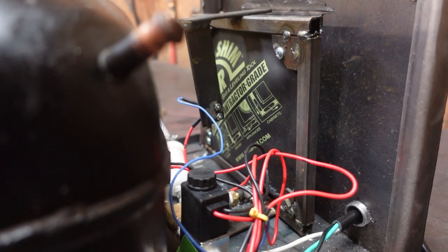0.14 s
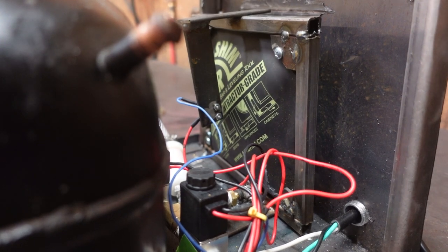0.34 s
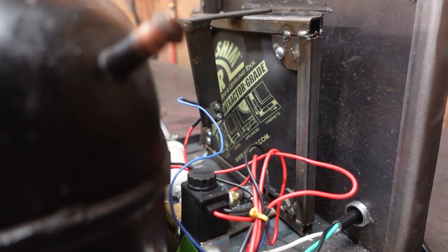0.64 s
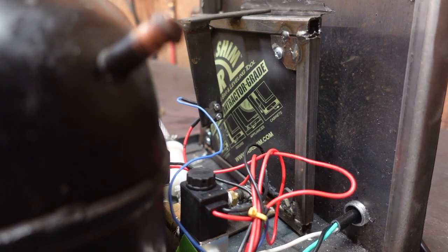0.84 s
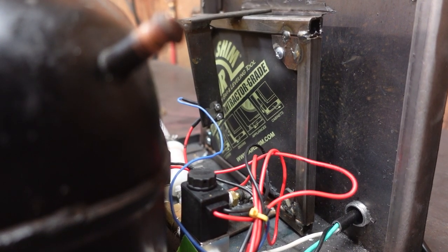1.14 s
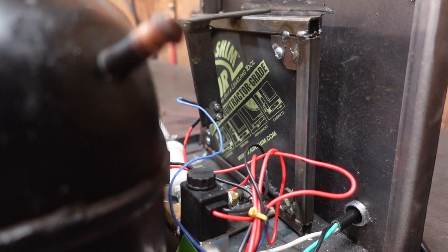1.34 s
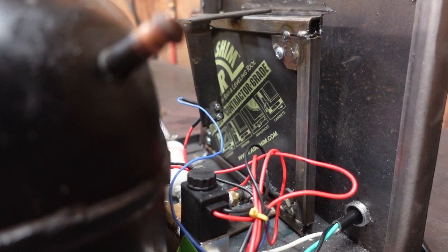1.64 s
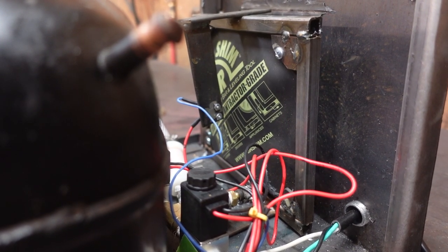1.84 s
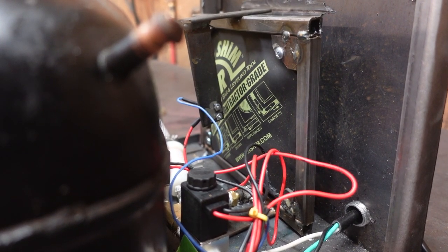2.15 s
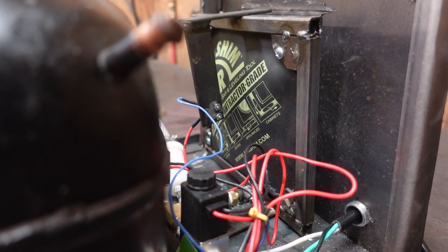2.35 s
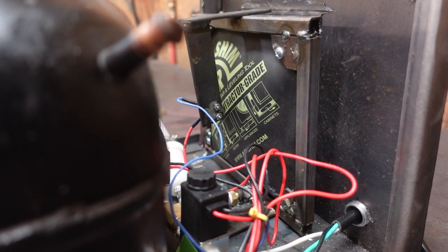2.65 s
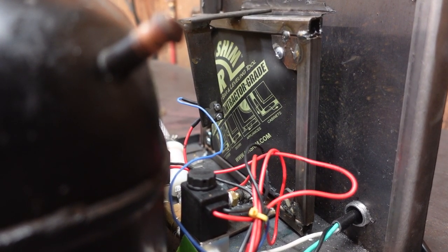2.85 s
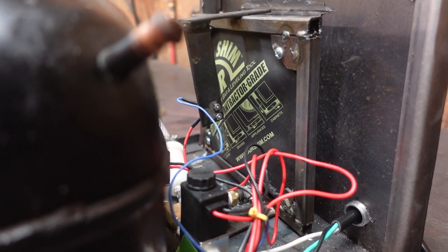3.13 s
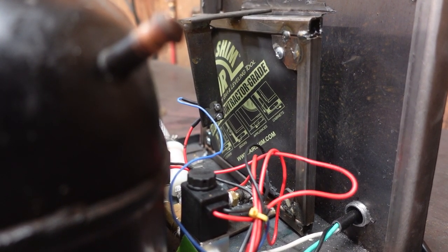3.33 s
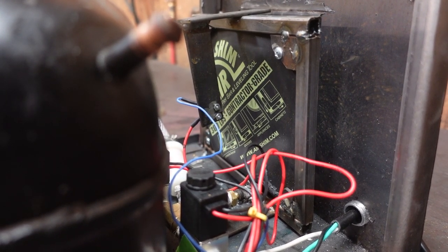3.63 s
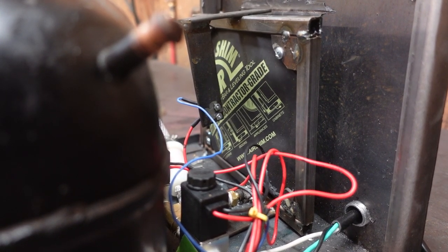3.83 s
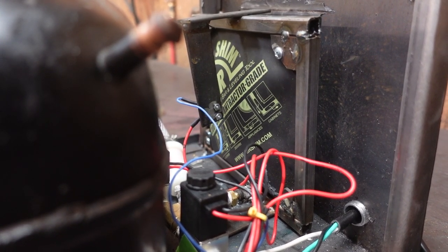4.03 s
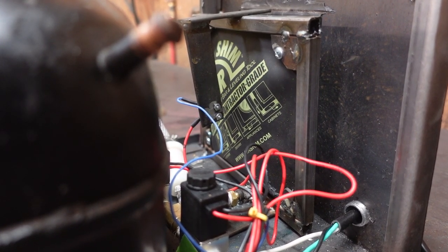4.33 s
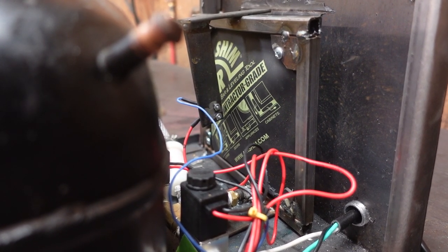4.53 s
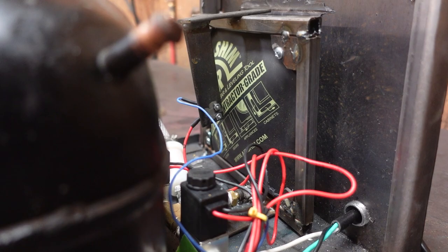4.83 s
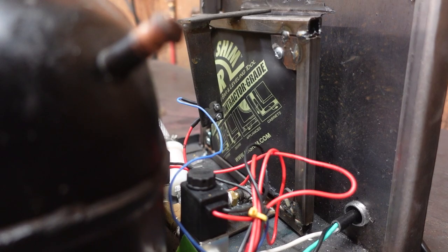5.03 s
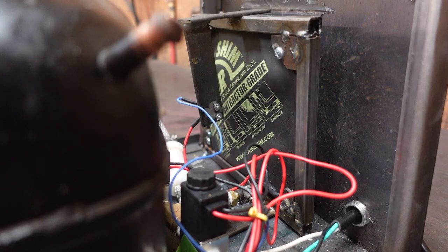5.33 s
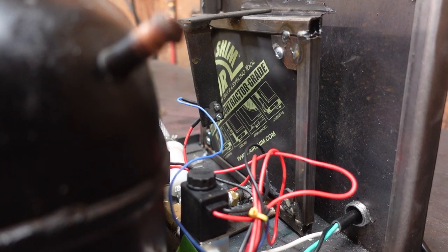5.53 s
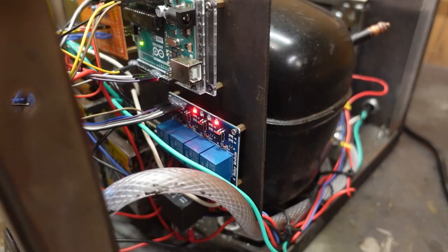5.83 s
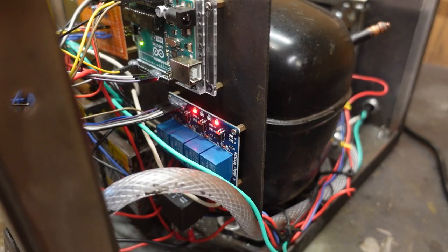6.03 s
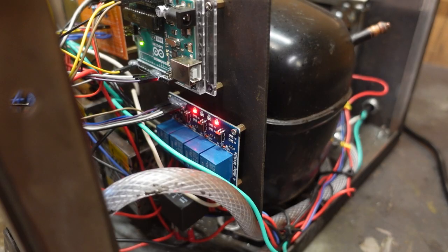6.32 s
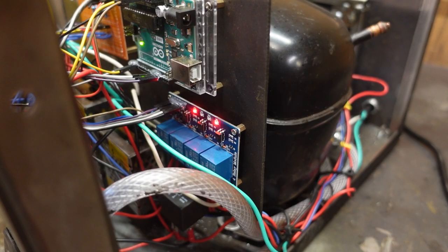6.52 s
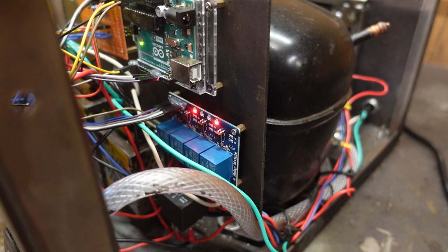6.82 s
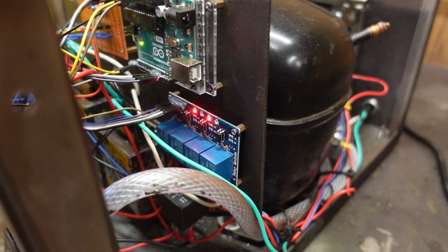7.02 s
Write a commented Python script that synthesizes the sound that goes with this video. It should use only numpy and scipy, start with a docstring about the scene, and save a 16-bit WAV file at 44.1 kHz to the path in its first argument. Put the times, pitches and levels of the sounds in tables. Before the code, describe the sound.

A small compressor hums while an electric valve clacks open about every two seconds, air hisses, and the valve vents with a puff.

```python
"""A small sealed compressor hums in a steel frame in a workshop, feeding an air line. Soon a relay
ticks and an electric valve clacks open as a magnet pulls its plunger in. Air sings through the pipe
for a second. Then the plunger springs back, the valve vents with a puff, the tubing rings and the gas
settles with a faint hiss. Dull knocks follow each change of pressure. This comes round about every
two seconds, and the sound ends just after the fourth opening."""
import sys
import numpy as np
from scipy import signal
from scipy.fft import rfft, irfft, next_fast_len
from scipy.io import wavfile
from scipy.ndimage import map_coordinates

SR = 44100
rng = np.random.default_rng(int(sys.argv[2]) if len(sys.argv) > 2 else 0)


def pcm_store(signal):
    """Save signal as 16-bit PCM."""
    levels = np.round(np.clip(np.atleast_2d(signal), -1, 1) * 32767)
    wavfile.write(sys.argv[1], SR, levels.astype(np.int16).T)


N = 316197
TIME = np.arange(N) / SR

# the plunger pulls in: start t/s, hit t/s, scrape level/dB, hit level/dB, ring level/dB, treble lift/dB
OPENINGS = [(0.5922, 0.6, -17.5, -5, -22.5, -6.5), (2.711, 2.718, -17.5, -4.5, -19.5, -1.5),
            (4.8753, 4.8827, -19, -6, -17.5, 1.5), (6.9451, 6.9516, -22.5, -10.5, -27, 3.5),
            (6.955, 6.9557, -30, -11, -18.5, 0)]
# the steel frame's tone colour (how strong each pitch is): f/Hz, relative level/dB
FRAME_COLOUR = [(120, -47.5), (200, -11), (432, -10), (558, -6.5), (1040, -15.5), (1530, -6), (1770, -8),
                (2420, -5.5), (2650, -9.5), (3190, -4), (3760, -13), (4950, -6.5), (8120, -16.5),
                (12600, -17), (16000, -30)]
# how long the frame rings: f/Hz, fade time/s (the time to fall by 60 dB, called t60)
FRAME_FADES = [(300, .3), (1500, .28), (4000, .24), (8000, .19), (15000, .17)]
def valve_opens():
    """A hard clack: the valve body rings and shakes the frame, which answers alike every time."""
    out = np.zeros(N)
    frame = from_db(7.5) * noise(FRAME_COLOUR, size=SR) * dying(0.045)
    frame += from_db(-3) * fading_noise(FRAME_COLOUR, FRAME_FADES)
    for start, hit, scrape_db, hit_db, ring_db, treble_db in OPENINGS:
        clack = plunger(hit - start, scrape_db, hit_db, hold_s=0.00045, t60=0.011)
        add(out, start, lift_treble(clack, treble_db))
        ring = frame + from_db(-5.5) * valve_ring()
        add(out, hit, from_db(ring_db) * lift_treble(ring, treble_db))
    return out


# tone colours of the plunger's scrape and of its hit: f/Hz, relative level/dB
SCRAPE_COLOUR = [(290, -40), (500, 0), (3150, 2), (7980, 11), (10200, 4), (11000, 3), (13300, 5),
                 (16000, -27)]
HIT_COLOUR = [(290, -6), (500, -10.5), (1250, -33), (3290, 0), (4600, -13.5), (8960, 0.5), (13400, 0),
              (16000, -11)]
def plunger(travel_s, scrape_db, hit_db, hold_s, t60):
    """The plunger scrapes along its tube, then chatters briefly against its stop."""
    t = TIME[:SR]
    since_hit = t - travel_s
    sliding = np.minimum(t / 0.0041, 1) * np.exp(-np.maximum(since_hit, 0) / 0.005)
    scrape = from_db(scrape_db) * noise(SCRAPE_COLOUR, size=SR) * sliding
    blow = (since_hit >= 0) * np.exp(-np.log(1000) * np.maximum(since_hit - hold_s, 0) / t60)
    return scrape + from_db(hit_db) * noise(HIT_COLOUR, size=SR) * blow


# the valve body's own notes: f/Hz, relative level/dB, fade time/s (held to 0.4 at most)
VALVE_NOTES = [(583.5, -9, 0.29), (815, -8, 0.22), (1204, -6.5, 0.17), (1543, 4.5, 0.1), (2000, -14, 0.28),
               (2140, 2, 0.089), (2340, -11, 0.15), (3170, -0.5, 0.095), (3725, -2, 0.1), (4010, -22, 0.48),
               (4260, -40, 0.46), (4600, -3, 0.045), (5020, -2, 0.05), (5370, 3.5, 0.029),
               (5520, -12.5, 0.084), (5950, -7, 0.096), (8800, -21, 0.2), (9920, -30, 0.25),
               (10300, -31, .15), (12300, -27, .19), (12810, -25, 0.25)]
def valve_ring(spread_db=4.0):
    """Every blow rings the same notes in the metal, each with a new strength."""
    return sum(from_db(db + spread_db * rng.standard_normal()) * ringing_note(hz, min(t60, .4))
               for hz, db, t60 in VALVE_NOTES)


# the plunger springs back: start t/s, hit t/s, scrape level/dB, hit level/dB, air level/dB,
# outlet pitch/ratio, panel level/dB
VENTINGS = [(1.6322, 1.6414, -26.5, -2, -22, 1, -29), (3.7526, 3.761, -20.5, -2, -19.5, 1, -24),
            (5.87, 5.8803, -15.5, -5, -22.5, 0.93, -18)]
# tone colour of the escaping air: f/Hz, relative level/dB
PUFF_COLOUR = [(59, -44), (100, -16.5), (260, -27), (315, -1.5), (691, -0.5), (818, -11.5), (991, -16),
               (1230, -5), (2000, -17), (2420, -6.5), (3940, -13.5), (6840, -15.5), (7770, -21),
               (10900, -21), (16000, -34)]
# how long the puff lasts: f/Hz, fade time/s
PUFF_FADES = [(150, 1), (600, 0.54), (1400, 1), (3000, 0.62), (6500, 0.61), (9000, 0.33), (15000, 0.45)]
# the outlet's breathy notes: f/Hz, width/Hz, relative level/dB
OUTLET_NOTES = [(402, 130, -2), (1377, 130, 4), (1630, 200, 1), (2573, 220, -10.5), (3254, 510, 1),
                (5440, 860, -12), (7060, 200, -13)]
def valve_vents():
    """Trapped air pops, shakes a panel and rushes out of an outlet whose pitch swoops up."""
    out = np.zeros(N)
    pop = np.sin(2 * np.pi * 330 * TIME[:SR]) * dying(0.0062)
    sag_hz = 330 * dying(.3)
    for start, hit, scrape_db, hit_db, air_db, pitch, panel_db in VENTINGS:
        add(out, start, plunger(hit - start, scrape_db, hit_db, hold_s=0.00018, t60=0.01))
        outlet = sum(from_db(db) * narrow_noise(hz * pitch - sag_hz * min(hz / 1400, 1), width)
                     for hz, width, db in OUTLET_NOTES)
        rush = from_db(-1.5) * fading_noise(PUFF_COLOUR, PUFF_FADES)
        rush += from_db(-3.5) * unit_level(outlet) * dying(0.66) * (1 - dying(0.11))
        rattle = noise(FRAME_COLOUR, size=SR) * dying(0.11)
        add(out, hit, from_db(air_db) * (rush + from_db(2.5) * rattle - from_db(22.5) * pop))
        panel = narrow_noise(np.full(SR, 820), width_hz=72) * dying(0.19)
        add(out, hit, from_db(panel_db) * panel)
    return out


# the tubing's own notes: f/Hz, relative level/dB, fade time/s (held to 0.5 at most)
TUBE_NOTES = [(1184, 0, 0.42), (1415, -7, 0.82), (2530, 0, 0.38), (2589, -9, 0.66), (3180, -10, 0.41),
              (3440, -11, 0.38), (4200, -17, 0.91), (4630, -18, 1.6), (4936, -7, 0.24), (5195, -20, 1.1),
              (5819, -20, 0.65), (6840, -5, 0.37)]
def tube_ring(below_air_db=14.5, spread_db=2.0):
    """The tubing rings each time it lets go of its pressure."""
    out = np.zeros(N)
    for _, hit, _, _, air_db, *_ in VENTINGS:
        for hz, db, t60 in TUBE_NOTES:
            note = ringing_note(hz, min(t60, .5))
            add(out, hit, from_db(air_db - below_air_db + db + spread_db * rng.standard_normal()) * note)
    return out


# dull knocks: t/s, level/dB, f/Hz
KNOCK_BLOWS = [(0.0040, -15, 413), (0.7945, -30.5, 656), (1.2250, -13, 443), (1.5542, -21.5, 479.7),
               (2.1497, -13, 416), (2.8980, -28.5, 587), (3.3280, -11, 435), (3.6560, -19, 486),
               (4.2877, -9.5, 403), (5.0765, -26, 610), (5.5081, -8.5, 445), (5.8355, -18, 480),
               (6.3614, -11, 374), (7.1510, -31.5, 497)]
def knocks(edge_hz=704, edge_db=-19.5):
    """Soft, low blows, each with a quieter, higher edge and a short dull echo of the room."""
    out = np.zeros(N)
    echo_colour = [(60, -17), (200, 0), (400, 6.5), (700, -4.5), (1100, -22.5), (4000, -45),
                   (12000, -61)]
    echo_shape = (1 - dying(.008)) ** 2 * (dying(0.3) + from_db(12.5) * dying(0.025))
    for s, db, hz in KNOCK_BLOWS:
        blow = thump(hz, cycles=.53) + from_db(edge_db) * thump(edge_hz, cycles=1.0)
        add(out, s - 0.01, from_db(db) * blow)
        add(out, s, from_db(db - 22) * noise(echo_colour, size=SR) * echo_shape)
    return out


def thump(hz, cycles):
    """A very short swing, strongest about 10 ms in; more cycles make it longer."""
    t = TIME[:SR // 50] - 0.01
    return np.cos(2 * np.pi * hz * t + np.pi / 3) * np.exp(-(t * hz / cycles) ** 2)


# short ticks (the relay, the valve's small after-click, and the sharp edge of three dull knocks):
# t/s, level/dB, lowest f/Hz, highest f/Hz
SHORT_TICKS = [(0.547, -31, 300, 14000), (0.6604, -24.5, 4000, 9000), (1.226, -27.5, 1200, 3500),
               (2.6980, -28, 300, 14000), (2.7647, -21.5, 4000, 9000), (3.329, -21.5, 1200, 4000),
               (4.84, -25.5, 297, 13850), (4.9426, -18, 4000, 8900), (5.508, -23, 1200, 3500),
               (6.913, -32.5, 300, 14050), (7.0165, -21.5, 3960, 8500)]
# tone colour of a tick: f/Hz, relative level/dB
TICK_COLOUR = [(200, 11.5), (500, 8), (1200, -9), (4000, -15), (8000, -9), (13000, -9), (16000, -10)]
def ticks():
    """Each tick is a quick burst of noise with a softer tail, kept to its own range of pitches."""
    out = np.zeros(N)
    for s, db, low_hz, top_hz in SHORT_TICKS:
        burst = noise(TICK_COLOUR, size=SR) * (dying(0.035) + from_db(-11.5) * dying(0.16))
        band = signal.butter(2, [low_hz, top_hz], "band", fs=SR, output="sos")
        add(out, s, from_db(db) * signal.sosfilt(band, burst))
    return out


# air starts to fill the line: t/s, flow level/dB, level/dB of the surge in the pump's shell
FILLS = [(0.66, -49, -48), (2.765, -45.5, -46), (4.943, -43.5, -39.5), (7.016, -47.5, -39.5)]
def air_line(fade_db_per_s=2, pressure_lag_s=0.4):
    """Gives the slackening flow, its age in seconds, and the pressure (0-1), which trails the valve."""
    flow, age, is_open = np.zeros((3, N))
    stops = [row[0] for row in VENTINGS] + [np.inf]
    for (start, db, _), stop in zip(FILLS, stops):
        gate = np.clip((TIME - start) / 0.04124 + 1, 0, 1) * np.clip((stop - TIME) / 0.0128 + 1, 0, 1)
        t = np.maximum(TIME - start, 0)
        flow += gate * from_db(db - fade_db_per_s * t)
        age += gate * t
        is_open += gate
    lag = np.exp(-1 / (pressure_lag_s * SR))
    return flow, age, signal.lfilter([1 - lag], [1, -lag], is_open)


# the pipe's own notes: f/Hz, width/Hz, relative level/dB, change over one second of filling/dB
PIPE_NOTES = [(1870, 80, -9, -10), (2300, 150, -13, 0), (2980, 70, -11, -10), (3150, 130, -15, 16),
              (3280, 35, -2, -10), (3560, 24, 0, 0), (3680, 30, -7, -3), (3940, 30, -1, -3),
              (4005, 28, 0, -5), (4890, 25, -9, 0), (5470, 80, -10, -3), (5970, 40, -11, 0),
              (6170, 20, -9, 2), (6800, 250, -19, 10), (7350, 50, -19, 0), (8540, 40, -10, 0),
              (9170, 60, -18, 0), (9600, 45, -13, 2), (9820, 40, -18, 0), (11000, 250, -21, 9),
              (12600, 450, -22, -7)]
# tone colour of the rushing air: f/Hz, relative level/dB
FLOW_COLOUR = [(180, -39), (300, -6), (603, 6.5), (1100, -4), (1360, 1.5), (1660, -6), (1870, -17),
               (2700, -9), (2930, -13.5), (3950, -15), (4230, -13.5), (12900, -16.5), (16000, -38)]
def air_flow(flow, age, whistle_hz=2220, rise_hz_per_s=460):
    """Air hisses and sets the pipe singing; as it fills, notes fade or grow and a whistle climbs."""
    from_middle = age - .5   # seconds from the middle of a usual fill
    singing = sum(resonate(rng.standard_normal(N), [note])
                  * from_db(change_db * from_middle + 0.7 * drift(6.7))
                  for *note, change_db in PIPE_NOTES)
    singing /= np.std(singing[age > 0])
    whistle = from_db(-21 + 13.5 * age) * narrow_noise(whistle_hz + rise_hz_per_s * age, width_hz=90)
    hiss = from_db(-3 + 4 * from_middle) * plate_echoes(noise(FLOW_COLOUR))
    return flow * (singing + whistle + hiss)


# gas settles in the pump after each venting: t/s, level/dB (each sound using it adds its own offset)
GAS_SETTLES = [(-0.35, -49), (1.75, -43), (3.87, -37.5), (5.99, -48)]
SETTLE_RISE_S = 0.032
def gas_hollow(flow, age, pressure, rest_hz=1440, sag_hz=139.6, wander_hz=16):
    """Gas sounds a breathy note in a hollow; the pitch sinks as the pressure rises, then recovers."""
    hz = rest_hz - sag_hz * pressure + wander_hz * drift(5.7)
    filling = flow * from_db(2.5 - 9.5 * age)
    settling = surges(GAS_SETTLES, SETTLE_RISE_S, fade_db_per_s=12.5)
    idle = from_db(-51.5) * (1 - pressure)
    core = from_db(-6) * narrow_noise(hz, width_hz=45.5)
    breath = from_db(-5.5) * narrow_noise(hz, width_hz=210)
    return np.sqrt(filling ** 2 + settling ** 2 + idle ** 2) * (core + breath)


def settling_hiss():
    """A faint, wide hiss lingers as the gas settles."""
    colour = [(200, -13), (900, 11), (2000, -6), (5000, -8), (12000, -14.5), (16000, -24)]
    level = from_db(-11.5) * surges(GAS_SETTLES, SETTLE_RISE_S, fade_db_per_s=4)
    return level * plate_echoes(noise(colour))


# tones of the motor and the mains: f/Hz, level/dB
HUM_TONES = [(59.3, -49.5), (69, -53), (91.5, -50.5), (120, -54), (128, -68)]
# the pump's sway on its springs, and its rumble: t/s, relative level/dB
SWAY_LEVELS = [(0.0, -45.5), (0.36, -23), (1.36, -38.5), (2.31, -46), (2.54, -30.5), (3.03, -36.5),
               (3.13, -56), (4.13, -32), (4.49, -39.5), (4.81, -25), (5.01, -34.5), (7.17, -43.5)]
RUMBLE_LEVELS = [(0.0, -48), (2.06, -45.5), (2.21, -45), (3.03, -45.5), (3.28, -41.5), (5.95, -41),
                 (6.47, -44.5), (7.17, -42)]
MOTOR_HZ, SWAY_HZ = 59.3, 13.9
def compressor():
    """The motor hums, wavering a little, while the pump rumbles and sways on its springs."""
    hum = 0
    for hz, db in HUM_TONES:
        level = from_db(db + drift(4)) * np.sqrt(2)
        hum += level * np.sin(2 * np.pi * (hz * TIME + rng.random()) + 0.31 * drift(2.03))
    sway = from_db(in_time(SWAY_LEVELS) - 2.5) * np.sqrt(2) * np.sin(2 * np.pi * SWAY_HZ * TIME)
    colour = [(10, -30), (30, 0.5), (60, 2), (130, 1.5), (220, -9), (500, -13), (1500, -39.5),
              (8000, -72.5)]
    rumble = from_db(in_time(RUMBLE_LEVELS) + 1) * noise(colour)
    return hum + sway + rumble


# notes of the pump's shell: f/Hz, width/Hz, relative level/dB
SHELL_NOTES = [(1870, 51, -1), (2270, 155, -11.5), (2978, 88, -2), (3279, 44, 4), (3990, 50, -9),
               (4300, 120, -12), (4880, 380, -14.5), (5570, 63, -12), (5900, 200, -21.5)]
def shell_hiss():
    """Each motor turn puffs gas into the shell. The hiss surges at each switching and swells between."""
    opening = surges([(s, db) for s, _, db in FILLS], rise_s=0.018, fade_db_per_s=29)
    venting = from_db(-3.5) * surges(GAS_SETTLES, SETTLE_RISE_S, fade_db_per_s=63)
    building = from_db(-5) * surges(GAS_SETTLES, rise_s=0.9, fade_db_per_s=7)
    idle = from_db(-56)
    flutter = from_db(drift(18))
    level = flutter * np.sqrt(opening ** 2 + venting ** 2 + building ** 2 + idle ** 2)
    puffs = from_db(2 * np.cos(2 * np.pi * MOTOR_HZ * TIME)) * rng.standard_normal(N)
    return level * plate_echoes(resonate(puffs, SHELL_NOTES))


def casing_drone():
    """The casing rings softly and steadily on four low notes."""
    notes = [(320, 14, 3), (607.5, 19.6, 3), (659, 33, -3.5), (882, 83, -3.5)]
    return from_db(-53.5) * plate_echoes(resonate(rng.standard_normal(N), notes))


# bright notes in the motor's rasp: f/Hz, width/Hz, relative level/dB
RASP_NOTES = [(2280, 660, 0.5), (4830, 550, 1), (6660, 240, 3.5), (7480, 220, 1), (8900, 620, -7),
              (9000, 150, -7), (9490, 140, 2.5), (10190, 110, -0.5), (10500, 180, -4), (11500, 120, -9),
              (11890, 200, 1.5), (13700, 900, -8.5), (15200, 300, -1)]
def motor_rasp():
    """The mechanism makes the same small rasp on every turn of the motor, whose speed wavers a little."""
    period = round(SR / MOTOR_HZ)
    one_turn = rng.standard_normal(period) * from_db(4.3 * np.cos(2 * np.pi * np.arange(period) / period))
    place = np.arange(N) + 1.7 * drift(14)   # in samples
    turning = map_coordinates(one_turn, [place % period], order=3, mode="grid-wrap")
    return from_db(-61 + drift(2.8)) * unit_level(resonate(turning, RASP_NOTES))


# the deep rumble's rise and fall: t/s, relative level/dB
DEEP_SWELLS = [(0.0, -58), (2.08, -72), (2.81, -63), (2.95, -61), (5.29, -39.5), (5.69, -50), (6.07, -48.5),
               (7.17, -47)]
def deep_rumble():
    """A low noise swells and sinks under the hum."""
    colour = [(12, -13), (26, -19), (50, 2), (80, -12), (200, -18), (2000, -90)]
    return from_db(in_time(DEEP_SWELLS) + 2) * noise(colour)


# tone colour of the workshop's background: f/Hz, relative level/dB
ROOM_COLOUR = [(25, 0), (114, -11), (394, -35), (863, -18.5), (1100, -47), (1400, -16), (1740, -39),
               (2600, -25.5), (3600, -41.5), (6700, -34), (8600, -42), (14800, -66), (16000, -62)]
def room_noise():
    """A faint, steady, mostly low noise fills the room."""
    return from_db(-54.5) * plate_echoes(noise(ROOM_COLOUR))


def plate_echoes(x, count=10):
    """Quick echoes off the steel plates ripple the colour of a hiss; comes out at level 1."""
    lags = (rng.uniform(.001, .016, count) * SR).astype(int)
    return unit_level(x + sum(.2 * (-1) ** k * np.roll(x, lag) for k, lag in enumerate(lags)))


def from_db(db):
    """Turn decibels into a number to multiply by."""
    return 10 ** (np.asarray(db) / 20)


def unit_level(x):
    """Scale a sound to an average (rms) level of 1."""
    return x / np.sqrt(np.mean(x ** 2) + 1e-20)


def in_time(rows):
    """Join (time, value) points with straight lines."""
    return np.interp(TIME, *np.transpose(rows))


def at_hz(points, hz):
    """Read between a table's frequencies, with octaves evenly spaced."""
    points = np.array(points)
    return np.interp(np.log(np.maximum(hz, 1)), np.log(points[:, 0]), points[:, 1])


def add(out, s, sound):
    """Mix a sound in at s seconds."""
    i = max(round(s * SR), 0)
    out[i:i + len(sound)] += sound[:N - i]


def noise(colour, size=N):
    """Noise at level 1, coloured by (f/Hz, level/dB) points."""
    n = next_fast_len(size)
    gain = from_db(at_hz(colour, np.arange(n // 2 + 1) * SR / n))
    return unit_level(irfft(rfft(rng.standard_normal(n)) * gain, n)[:size])


def narrow_noise(hz, width_hz):
    """A breathy note at level 1: a narrow band of noise round a pitch that may move."""
    lowpass = signal.butter(2, width_hz / 2, fs=SR, output="sos")
    slow = signal.sosfilt(lowpass, rng.standard_normal((2, len(hz))))
    phase = 2 * np.pi * np.cumsum(hz) / SR
    return unit_level(slow[0] * np.cos(phase) + slow[1] * np.sin(phase))


def fading_noise(colour, fades):
    """One second of noise in which each quarter octave fades at its own speed."""
    edges = 70 * 2 ** (np.arange(33) / 4)
    bins, hz = rfft(noise(colour, size=SR)), np.arange(SR // 2 + 1)
    return sum(irfft(bins * ((hz >= low) & (hz < high)), SR) * dying(at_hz(fades, np.sqrt(low * high)))
               for low, high in zip(edges, edges[1:]))


def drift(rate):
    """A random wander of about 1 either way, with rate new values a second."""
    points = rng.standard_normal(4000)
    return unit_level(np.interp(TIME * rate, np.arange(len(points)), points))


def resonate(x, notes):
    """Let a sound ring at (f/Hz, width/Hz, level/dB) notes; every second one is added upside down."""
    out = 0
    for k, (hz, width, db) in enumerate(notes):
        r = np.exp(-np.pi * width / SR)
        poles = [1, -2 * r * np.cos(2 * np.pi * hz / SR), r * r]
        ringing = signal.lfilter(np.array([1, 0, -1]) * (1 - r * r) / 2, poles, x)
        out += (-1) ** k * from_db(db) * ringing
    return out


def dying(t60):
    """A one-second fade that falls 60 dB every t60 seconds."""
    return np.exp(-np.log(1000) * TIME[:SR] / t60)


def ringing_note(hz, t60):
    """A pure, fading tone that starts anywhere in its swing."""
    return np.sin(2 * np.pi * (hz * TIME[:SR] + rng.random())) * dying(t60)


def surges(rows, rise_s, fade_db_per_s):
    """A loudness curve that rises and fades at each (t/s, level/dB) event."""
    out = 0
    for s, db in rows:
        age = np.maximum(TIME - s, 0)
        out += (1 - np.exp(-age / rise_s)) * from_db(db - fade_db_per_s * age)
    return out


def lift_treble(x, db):
    """Turn the sound above 6 kHz up or down."""
    treble = signal.sosfilt(signal.butter(1, 6000, "high", fs=SR, output="sos"), x)
    return x + (from_db(db) - 1) * treble


def scene():
    """The running pump, the room and the air in the line, with the switching on top, in one channel."""
    flow, age, pressure = air_line()
    pump = compressor() + shell_hiss() + casing_drone() + motor_rasp()
    background = room_noise() + deep_rumble()
    air = gas_hollow(flow, age, pressure) + air_flow(flow, age) + settling_hiss()
    switching = valve_opens() + valve_vents() + ticks() + knocks() + tube_ring()
    return (switching + air + pump + background)[None]


def record(dry, cutoff_hz=15850):
    """The loudest clacks overload, and the highest treble is cut."""
    lowpass = signal.ellip(10, .2, 70, cutoff_hz, fs=SR, output="sos")
    return signal.sosfilt(lowpass, np.clip(dry, -1, 1))


dry = scene()
out = record(dry)
pcm_store(out)
```